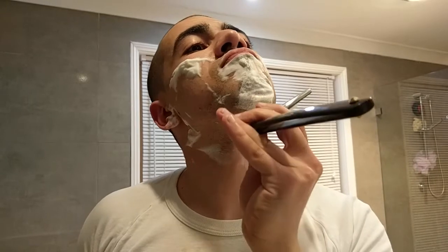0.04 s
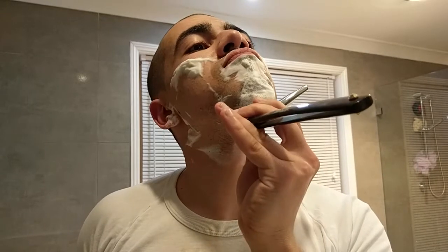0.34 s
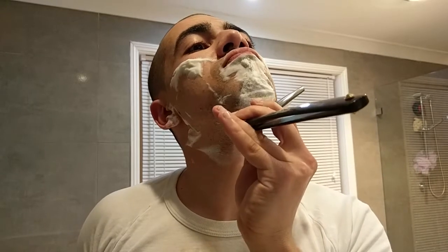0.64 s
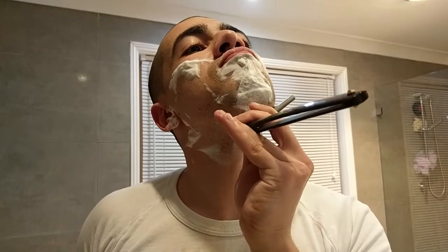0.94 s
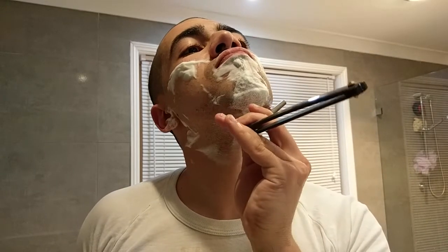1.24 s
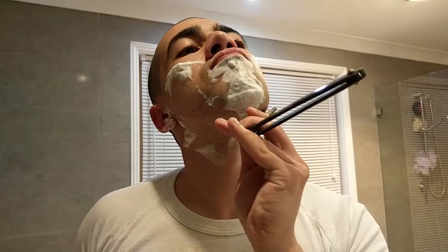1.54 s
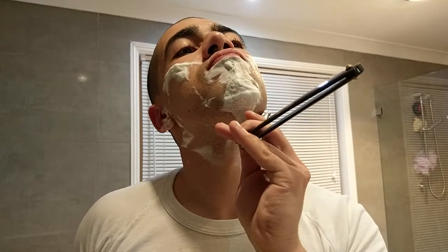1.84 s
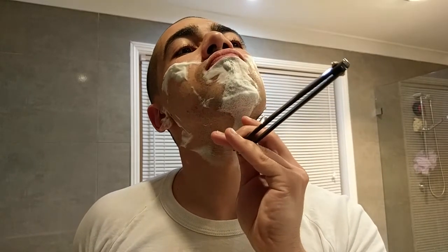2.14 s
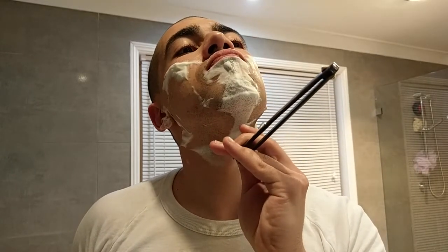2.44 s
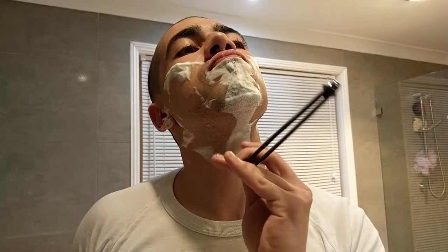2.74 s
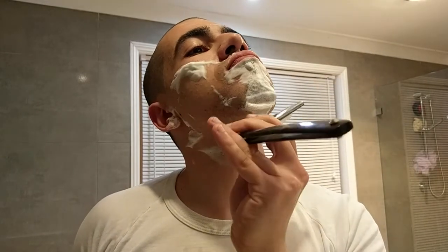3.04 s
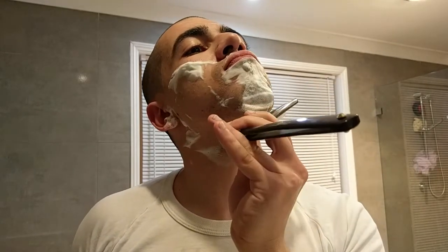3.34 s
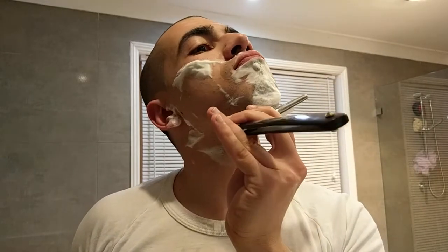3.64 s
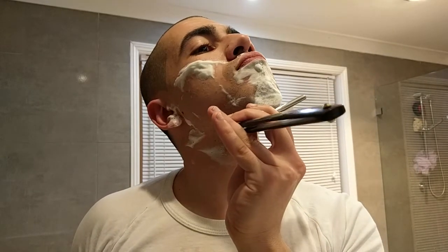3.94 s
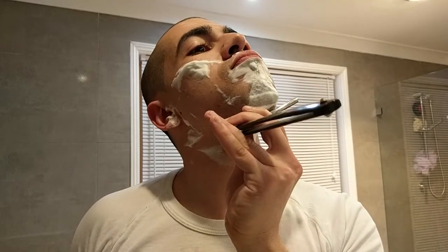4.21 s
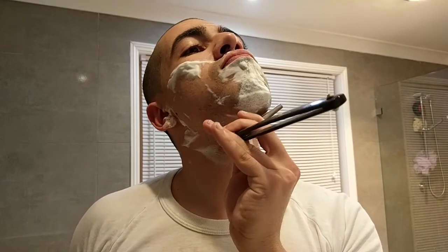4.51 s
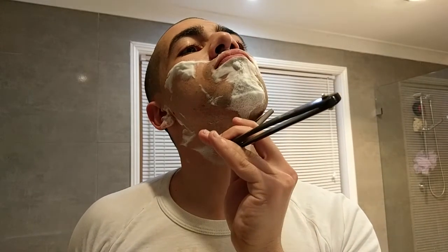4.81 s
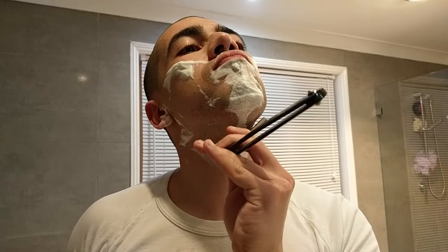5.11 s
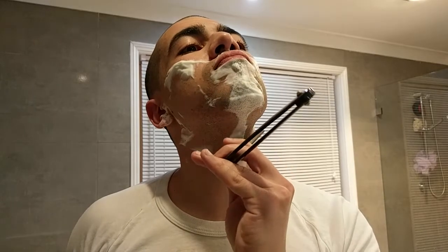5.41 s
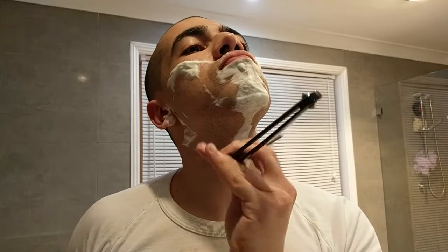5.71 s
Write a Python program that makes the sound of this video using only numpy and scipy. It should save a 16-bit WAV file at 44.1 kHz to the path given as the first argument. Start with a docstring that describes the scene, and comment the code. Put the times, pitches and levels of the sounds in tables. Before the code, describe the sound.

Soft, crackly rasps of a razor shaving whiskers from chin to throat, with a short pause, over low room noise.

```python
"""Shaving with a straight razor

Two slow passes of short strokes run from a lathered chin down the throat, in a quiet tiled bathroom.
Each cut whisker is a tiny impulse that excites the modes of the steel and bends the blade.
Friction makes the edge hiss in the lather and the skin rub and thrum.
The tiles reverberate faintly over a low, steady room noise."""
import sys
import numpy as np
from scipy import signal
from scipy.fft import rfft, irfft, next_fast_len
from scipy.io import wavfile
from scipy.ndimage import uniform_filter1d, map_coordinates

SR = 44100
rng = np.random.default_rng(int(sys.argv[2]) if len(sys.argv) > 2 else 0)


def persist_wave(psi):
    """Save psi, clipped to +-1, as 16-bit WAV."""
    counts = np.round(np.clip(psi, -1, 1) * 32767).astype(np.int16)
    wavfile.write(sys.argv[1], SR, np.atleast_2d(counts).T)


N = 258426
TIME = np.arange(N) / SR
HALF_EACH_WAY = np.array([[.5], [-.5]])  # splits a left-right contrast between the channels


def amp(db):
    """Amplitude ratio of a level in decibels."""
    return 10 ** (np.asarray(db) / 20)


def unit_rms(x):
    """Normalisation: the mean of the channels gets rms 1."""
    return x / np.sqrt(np.mean(np.atleast_2d(x).mean(0) ** 2) + 1e-20)


def curve(table, hz, column=1):
    """Interpolation of one column on a log-frequency axis."""
    columns = np.transpose(table)
    return np.interp(np.log(hz + 1), np.log(columns[0] + 1), columns[column])


def filtered(x, response):
    """Linear filtering: the spectrum of x times a complex frequency response."""
    size = next_fast_len(N + SR // 2)
    return irfft(rfft(x, size) * response(np.fft.rfftfreq(size, 1 / SR)), size)[..., :N]


def noise(spectrum, shape=(2, N)):
    """Spectral shaping: white noise takes on the given colour."""
    return filtered(rng.standard_normal(shape), lambda hz: amp(curve(spectrum, hz)))


def swell(start, end, rise_s, fall_db_per_s):
    """Envelope: a linear rise up to the start, a hold, and exponential decay after the end."""
    rise = np.clip(1 + (TIME - start) / rise_s, 0, 1)
    return rise * amp(-fall_db_per_s * np.maximum(TIME - end, 0))


# air noise: (frequency [Hz], relative spectral density [dB])
AIR_SPECTRUM = [(20, -16.5), (40, -13.5), (70, -13), (125, -9), (190, -15.5), (400, -21), (800, -24.5),
                (1400, -27), (1850, -24), (2800, -31.5), (4400, -34.5), (8000, -37.5), (12000, -43),
                (15500, -49)]
# its likeness in the two channels: (frequency [Hz], coherence [0..1])
AIR_COHERENCE = [(45, .99), (65, 1), (88, 0.98), (120, 0.87), (190, .25), (260, 0), (600, .03), (2000, 0),
                 (12000, .0)]
# its balance: (frequency [Hz], left minus right [dB])
AIR_BALANCE = [(1200, -0.5), (1700, -1), (2300, -3.5), (4000, -2.5), (7000, -3.5), (12000, -3)]
# mains harmonics: (frequency [Hz], level [dB])
MAINS_HUM = [(100, -88.5), (200, -90), (300, -93)]
def room_noise():
    """Spatial coherence: steady air noise is alike left and right only in the bass; the mains hum."""
    mid, side = noise(AIR_SPECTRUM)
    side = filtered(side, lambda hz: np.tan(np.arccos(curve(AIR_COHERENCE, hz)) / 2))
    air = np.array([mid + side, mid - side])
    air = filtered(air, lambda hz: amp(HALF_EACH_WAY * curve(AIR_BALANCE, hz)))
    hum = sum(amp(db) * np.sqrt(2) * np.sin(2 * np.pi * (hz * TIME + rng.random()))
              for hz, db in MAINS_HUM)
    return amp(-72) * unit_rms(air) + hum


RUB_RISE_S, RUB_FALL_DB_PER_S = 0.19, 84
# passes of the blade: (lands [s], leaves chin [s], reaches throat [s], meets loose skin [s], lifts [s])
BLADE_PASSES = [(0.6, 1.245, 1.75, 2.196, 2.8), (4.0, 4.442, 4.68, 5.5, 5.56)]
# rub and thrum of the skin: (frequency [Hz], relative level [dB])
RUB_SPECTRUM = [(50, -39), (120, 1), (210, -1.5), (330, 0), (700, -4.5), (1400, -6), (3000, -10.5),
                (5000, -13.5), (8000, -36), (15000, -49)]
THRUM_SPECTRUM = [(25, -6), (100, 2), (200, -5), (300, -10.5), (500, -13.5), (3000, -71)]
def skin_friction():
    """Sliding friction: skin rubs and thrums under the flat of the blade, most where it is loose."""
    drag = np.zeros(N)
    for lands, _, _, loosens, lifts in BLADE_PASSES:
        taut = amp(-86.5) * swell(lands, lifts, RUB_RISE_S, RUB_FALL_DB_PER_S)
        loose = amp(-75) * swell(loosens, lifts, RUB_RISE_S, RUB_FALL_DB_PER_S)
        drag += np.maximum(taut, loose)
    rub = amp(-2.5) * unit_rms(noise(RUB_SPECTRUM))
    thrum = amp(-0.5) * unit_rms(noise(THRUM_SPECTRUM, shape=N))
    return drag * (rub + thrum)


def throat_share(flatten_per_s=.35):
    """Timbre follows the point of contact: 0 on the chin, where each pass begins, 1 on the throat."""
    throat = np.zeros(N)
    for lands, leaves, reaches, _, _ in BLADE_PASSES:
        travel = np.interp(TIME, [leaves, reaches], [0, 1])
        # down the throat the edge flattens, and its colour drifts back towards that of the chin
        travel -= flatten_per_s * np.maximum(TIME - reaches, 0)
        throat = np.where(TIME > lands - RUB_RISE_S, travel, throat)
    return np.clip(throat, 0, 1)


def snap(spectrum, scatter, ripple_db, stray_s, size=512):
    """Minimum-phase impulse: each spot of the edge gives a click its own colour and path delay."""
    hz = np.fft.rfftfreq(size, 1 / SR)
    knots = [np.linspace(0, 19, len(hz))]
    ripple = np.array([map_coordinates(rng.standard_normal(20), knots) for channel in "LR"])
    db = curve(spectrum, hz * np.exp(scatter * rng.standard_normal())) + ripple_db * ripple
    # folding the cepstrum makes the click causal
    cepstrum = irfft(np.log(amp(db)))
    cepstrum[:, 1:size // 2] *= 2
    cepstrum[:, size // 2 + 1:] = 0
    delay_s = 8 / SR + stray_s * np.clip(rng.standard_normal((2, 1)), -2, 2)
    click = irfft(np.exp(rfft(cepstrum) - 2j * np.pi * hz * delay_s))
    return click / np.linalg.norm(click) * np.sqrt(2)


# a snap on the chin and on the throat: (frequency [Hz], relative level [dB])
CHIN_SPECTRUM = [(1200, -23.5), (2500, -20), (4000, -10.5), (6000, -4.5), (6400, -4), (6800, -2),
                 (7250, -7), (8600, -1), (9700, 4.5), (10400, -8), (11200, -4.5), (12600, -10),
                 (14000, -19), (15500, -19.5)]
THROAT_SPECTRUM = [(1200, -30), (2500, -23.5), (4000, -11), (5000, -5), (5650, -2.5), (6500, -6),
                   (7500, -5.5), (8200, -4), (8900, 3.5), (9700, -5.5), (10500, -5.5), (12000, -12),
                   (13500, -18), (15500, -38.5)]
# the thickest whiskers giving way: (time [s], relative level [dB])
WHISKER_BREAKS = [(0.5055, -61), (0.616, -56), (0.6785, -53), (0.8132, -59), (0.9817, -55), (1.148, -53),
                  (1.3947, -55), (1.4702, -55), (1.8141, -53.5), (1.826, -57), (1.9023, -49.5),
                  (1.9205, -61), (1.952, -56), (1.9834, -61), (2.0449, -52), (2.0872, -53), (2.1048, -56),
                  (2.1573, -50.5), (2.1855, -55), (2.4296, -52), (2.475, -55), (2.485, -52.5), (2.518, -55),
                  (4.013, -53), (4.0216, -54), (4.0311, -52), (4.127, -53.5), (4.7056, -56.5),
                  (4.8025, -63), (5.0827, -58), (5.1676, -55.5), (5.2371, -52.5), (5.2656, -55.5),
                  (5.3264, -56), (5.4655, -50.5), (5.5212, -52)]
def thick_whiskers(throat):
    """Fracture: a thick whisker cracks and tugs the blade; two weaker neighbours follow at once."""
    cracks, tugs = np.zeros((2, N + SR)), np.zeros(N)
    for time_s, db in WHISKER_BREAKS:
        onset = round((time_s + .001) * SR)
        lather_db = -3 * (1 - throat[onset])  # the thick lather of the chin cushions the crack
        spectrum = THROAT_SPECTRUM if throat[onset] > .5 else CHIN_SPECTRUM
        # a clean break lets the edge ring longer, which sharpens its resonances
        sharpened = [(hz, 1.5 * level) for hz, level in spectrum]
        lags_s = 0, rng.uniform(.0003, .0012), rng.uniform(.0013, .003)
        for lag_s, size_db in zip(lags_s, (3, -1.5, -4.5)):
            click = snap(sharpened, scatter=0.029, ripple_db=3.2, stray_s=4e-6)
            click *= amp(db + size_db + lather_db) / np.abs(click).max()
            start = onset + int(lag_s * SR)
            cracks[:, start:start + click.shape[1]] += click
        tugs[onset] = amp(db)
    return cracks[:, :N], tugs


def resonate(x, modes, alternate=False):
    """Modal superposition: x drives damped modes, of alternating sign for a bar driven at its tip."""
    t = np.arange(SR // 4) / SR
    response = np.zeros(len(t))
    for k, (hz, db, t60) in enumerate(modes):
        sign = -1 if alternate and k % 2 else 1
        response += sign * amp(db - 60 * t / t60) * np.cos(2 * np.pi * hz * t)
    response /= np.linalg.norm(response)
    return signal.fftconvolve(np.atleast_2d(x), response[None], axes=1)[:, :N]


# thin tones of the steel: (frequency [Hz], relative level [dB], 60 dB decay time [s])
STEEL_MODES = [(5300, -3, 0.048), (5010, -6, 0.069), (5560, -2.5, 0.049), (5870, -2.5, 0.061),
               (6210, 0.5, 0.026), (6690, 6, 0.024), (8500, -5.5, 0.028), (8700, -2.5, 0.021),
               (9830, -1, 0.023)]
# bending of the blade in its handle: (frequency [Hz], relative level [dB], 60 dB decay time [s])
BENDING_MODES = [(1751.5, 5.5, 0.037), (1846, -4, 0.03), (1877, -1.5, 0.053), (1850, -4.5, 0.014)]
def blade_resonance(snaps, force):
    """Impulse excitation: snaps ring the steel, and the pull of the whiskers bends the blade."""
    return amp(-16) * resonate(snaps, STEEL_MODES) + resonate(force, BENDING_MODES, alternate=True)


BITE_S, RELEASE_DB_PER_S, UNBEND_DB_PER_S = 0.011, 86.5, 164
JUDDER_DB, JUDDER_PER_S = 1.12, 40
# strokes: (start [s], length [s], first cutting level [dB], last [dB], flex over cutting level [dB])
EDGE_STROKES = [(0.614, 0.42, -73.5, -76, -4.5), (1.143, 0.035, -73.5, -77, -19),
                (1.393, 0.052, -73, -74, -7), (1.629, 0.69, -78.5, -72, -10),
                (2.247, 0.25, -73.5, -71.5, -4), (2.589, 0.067, -74, -78, -19),
                (4.012, 0.022, -76, -77, 1.5), (4.116, 0.34, -74.5, -77.5, -4),
                (4.655, 0.14, -76.5, -74, -9), (4.89, 0.19, -80.5, -76.5, -3.5),
                (5.187, 0.29, -78.5, -71, -3.5)]
def stroke_levels():
    """Attack and decay, in dB: the edge bites quickly and coasts to a stop; the blade unbends sooner."""
    cut = flex = np.full(N, 1e-6)
    for start, length, first_db, last_db, flex_db in EDGE_STROKES:
        end = start + length
        push = amp(np.interp(TIME, [start, end], [first_db, last_db]))
        cut = np.maximum(cut, push * swell(start, end, BITE_S, RELEASE_DB_PER_S))
        flex = np.maximum(flex, push * amp(flex_db) * swell(start, end, BITE_S, UNBEND_DB_PER_S))
    # uneven stubble makes both levels waver
    judder_db = JUDDER_DB * map_coordinates(rng.standard_normal(N // 100), [TIME * JUDDER_PER_S])
    return 20 * np.log10(cut) + judder_db, 20 * np.log10(flex) + judder_db


def whisker_impulses(per_second, spread_db, spots=12):
    """Poisson process: whiskers part at random moments, each at one of several spots of the edge."""
    parts = rng.random(N) < per_second / SR
    sizes = amp(spread_db * np.clip(rng.standard_normal(N), -2, 2))
    impulses = parts * sizes * rng.choice([-1, 1], N)
    local_power = np.abs(uniform_filter1d(impulses ** 2, SR // 25))
    at_spot = rng.integers(spots, size=N) == np.arange(spots)[:, None]
    return impulses / np.sqrt(local_power + 0.0019) * at_spot


def stubble(cut_db, throat):
    """Shot noise: dense snaps of fine whiskers merge into a rasp over the hiss of the edge in lather."""
    # a faster stroke meets more whiskers a second; they stand sparser on the throat
    per_second = 1250 * amp(.6 * (cut_db + 71.5)) * (1 - .35 * throat)
    spots = whisker_impulses(per_second, spread_db=6.5)
    rasp = np.zeros((2, N))
    for spectrum, share in ((CHIN_SPECTRUM, 1 - throat), (THROAT_SPECTRUM, throat)):
        push = amp(cut_db) * np.sqrt(share)
        for impulses in spots:
            click = snap(spectrum, scatter=0.04, ripple_db=4, stray_s=6e-6)
            rasp += amp(-0.5) * signal.oaconvolve((impulses * push)[None], click, axes=1)[:, :N]
        hiss = unit_rms(noise(spectrum))
        rasp += amp(-12) * push * hiss
    return rasp, spots.sum(0)


# paths to two microphone ports: (frequency [Hz], left minus right [dB], left lead at off_axis=1 [rad])
PORT_RESPONSE = [(1050, -2.5, -2), (1860, 2, -2), (2380, -3.5, 2.5), (5100, -3.5, 1.66), (6400, -1.5, 3.5),
                 (8150, 2.5, 1.8), (9020, 0.5, 2.5), (9770, 1.5, 3), (11070, 8.5, 2), (12600, -0.5, 2.2)]
def direct_path(x, off_axis):
    """Directional hearing: the direct sound reaches the two ports with unequal level and phase."""
    def response(hz):
        gain = amp(HALF_EACH_WAY * curve(PORT_RESPONSE, hz))
        phase = HALF_EACH_WAY * off_axis * curve(PORT_RESPONSE, hz, column=2)
        return gain * np.exp(1j * phase)
    return filtered(x, response)


def razor():
    """Source and resonator: parting whiskers drive the blade, which lies further off axis on the throat."""
    cut_db, flex_db = stroke_levels()
    throat = throat_share()
    rasp, pulls = stubble(cut_db, throat)
    cracks, tugs = thick_whiskers(throat)
    snaps = rasp + cracks
    sound = snaps + blade_resonance(snaps, force=amp(flex_db) * pulls + amp(1.7) * tugs)
    return (1 - throat) * direct_path(sound, off_axis=0.74) + throat * direct_path(sound, off_axis=0.85)


def early_reflections(x, latest_s=.009, count=10):
    """Specular reflection: hand, mirror and basin send each port its own delayed copies."""
    taps = np.zeros((2, SR // 10))
    for port in taps:
        signs = rng.choice([-1, 1], count)
        delays = (rng.uniform(.0005, latest_s, count) * SR).astype(int)
        port[delays] = signs / np.sqrt(count)
    return signal.fftconvolve(x, taps, axes=1)[:, :N]


# the tiled room: (frequency [Hz], reverberation time [s])
TILE_DECAY = [(300, 0.74), (2000, 0.63), (6000, 0.64), (12000, 0.13)]
def tile_reverberation(x):
    """Diffuse field: the answer of the tiles decays exponentially, uncorrelated at the two ports."""
    hz, t, bands = signal.stft(rng.standard_normal((2, SR // 2)), SR, nperseg=256)
    decay = amp(-60 * t / curve(TILE_DECAY, hz)[:, None])
    tail = signal.istft(bands * decay, SR, nperseg=256)[1]
    tail = np.pad(tail / np.linalg.norm(tail[0]), ((0, 0), (SR // 250, 0)))  # arrives 4 ms late
    return signal.fftconvolve(x, tail, axes=1)[:, :N]


def scene():
    """Superposition: the razor close by, its echoes, the skin and the room."""
    direct = razor()
    echoes = amp(-10.5) * early_reflections(direct) + amp(-5.5) * tile_reverberation(direct)
    return amp(1.5) * direct + echoes + skin_friction() + room_noise()


def record(dry, top_hz=15700, offset=-.0054):
    """Band limiting: an ideal low-pass filter, with the signal resting slightly off zero."""
    return filtered(dry, lambda hz: hz < top_hz) + offset


dry = scene()
out = record(dry)
persist_wave(out)
```